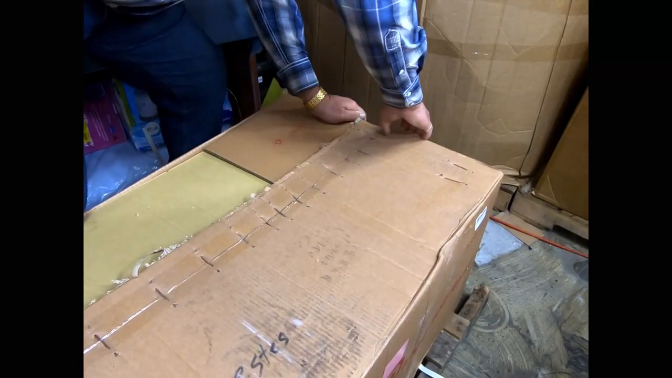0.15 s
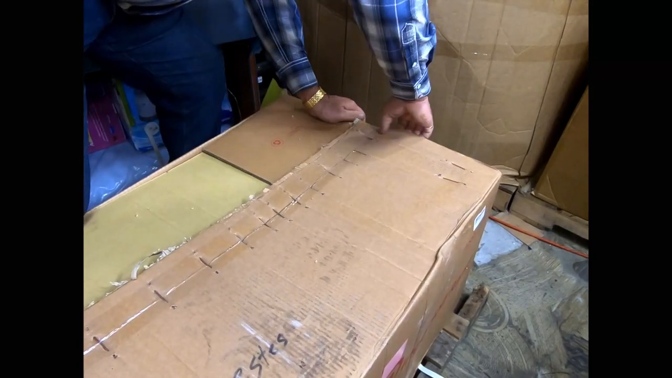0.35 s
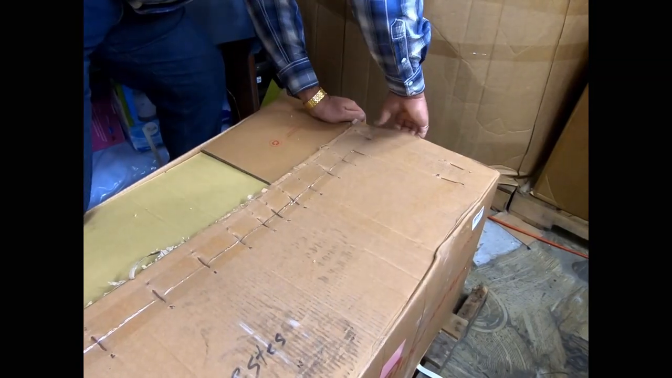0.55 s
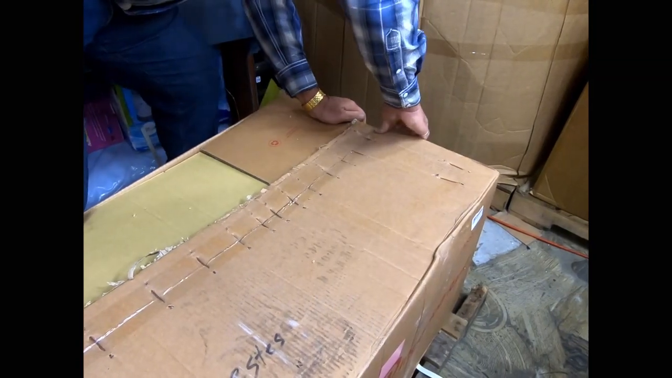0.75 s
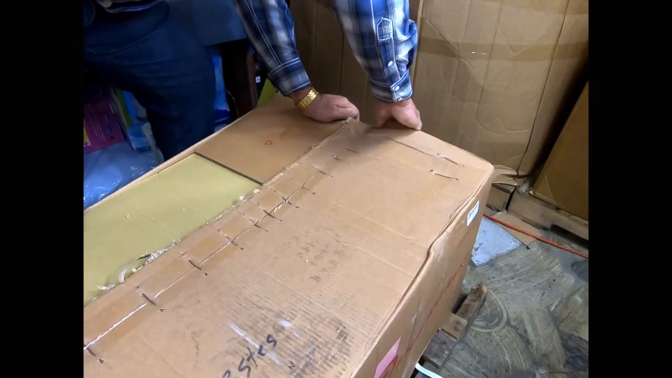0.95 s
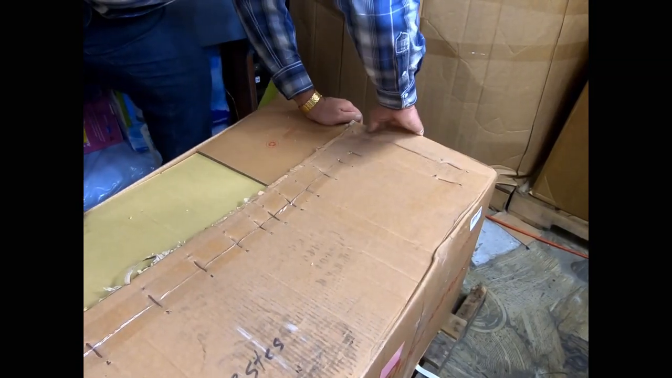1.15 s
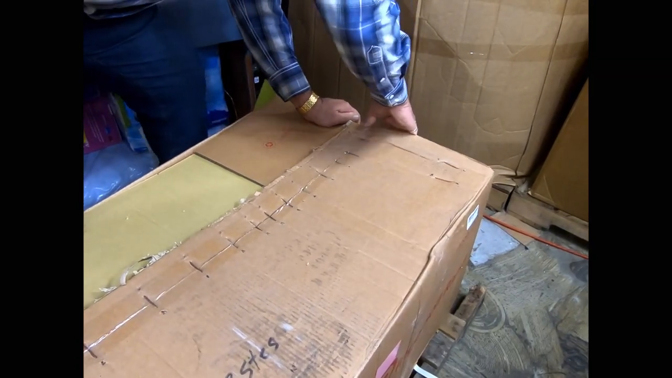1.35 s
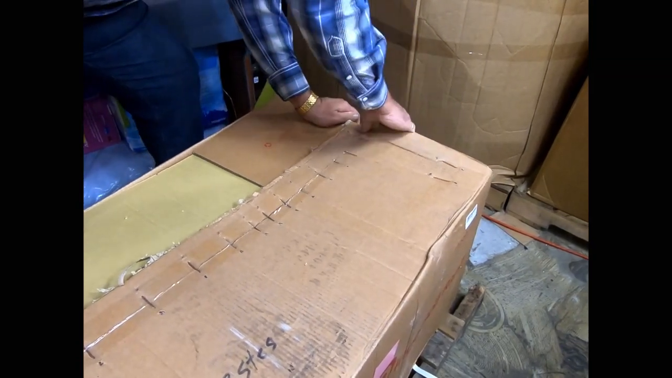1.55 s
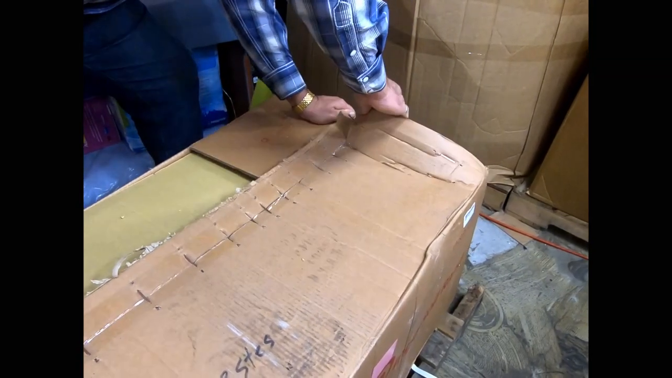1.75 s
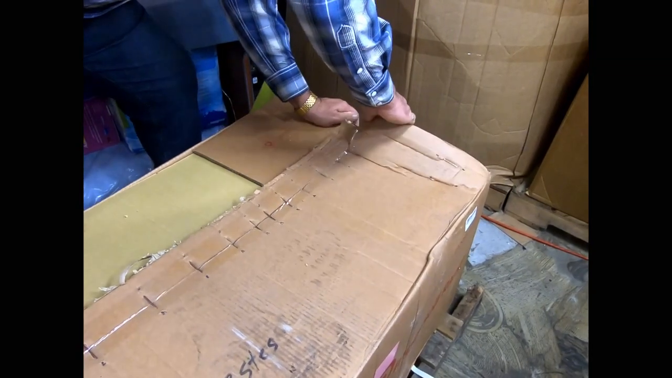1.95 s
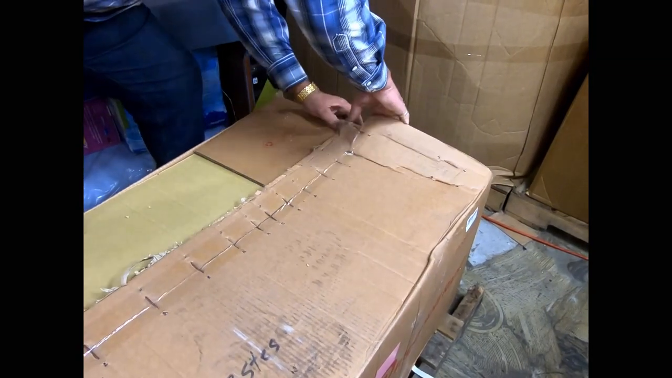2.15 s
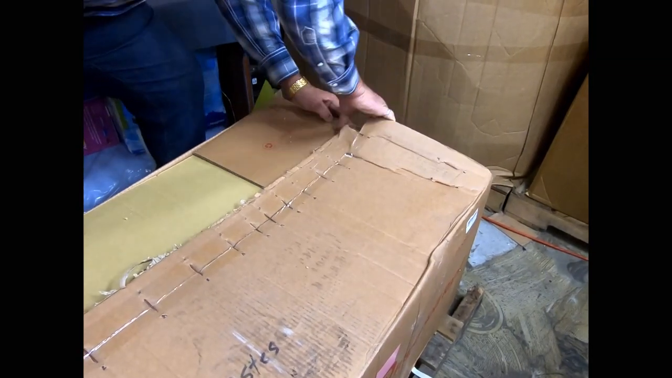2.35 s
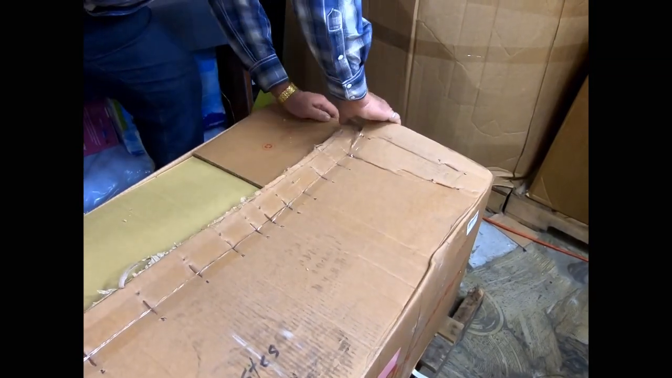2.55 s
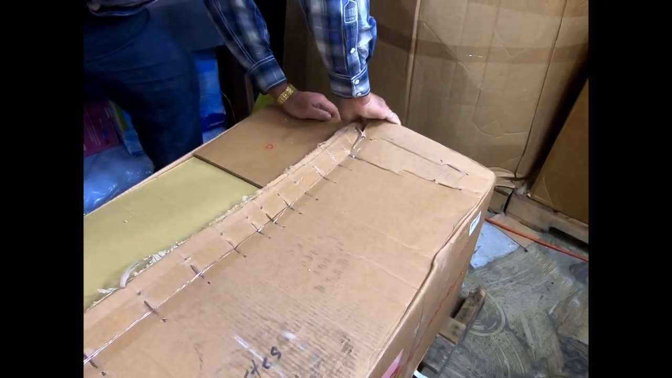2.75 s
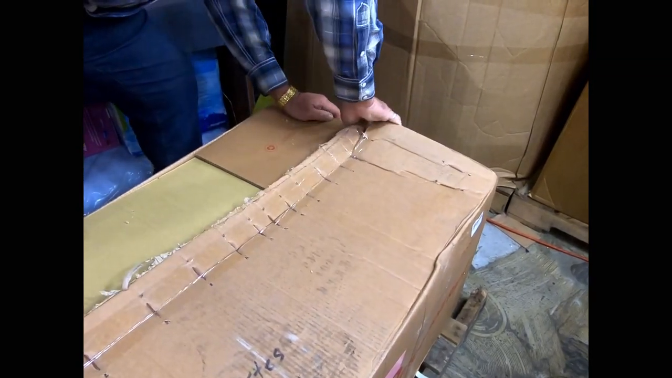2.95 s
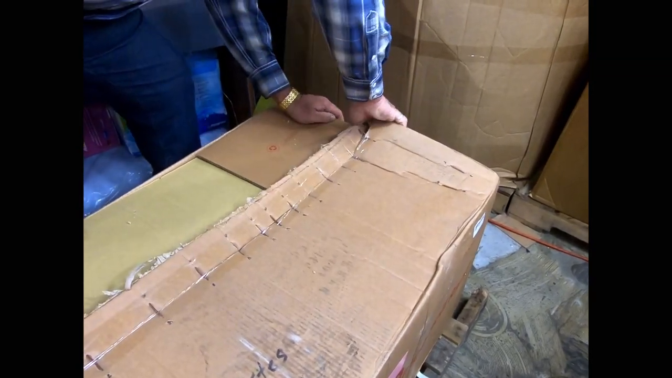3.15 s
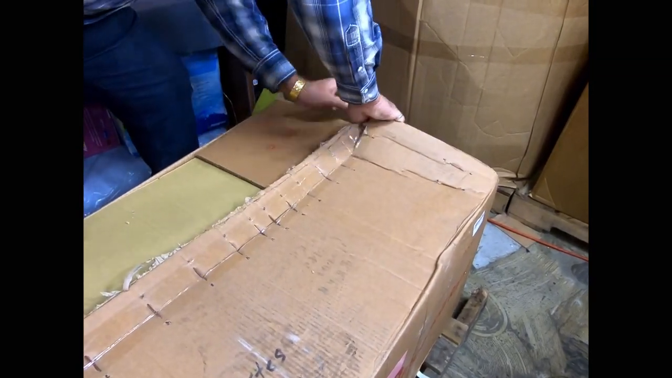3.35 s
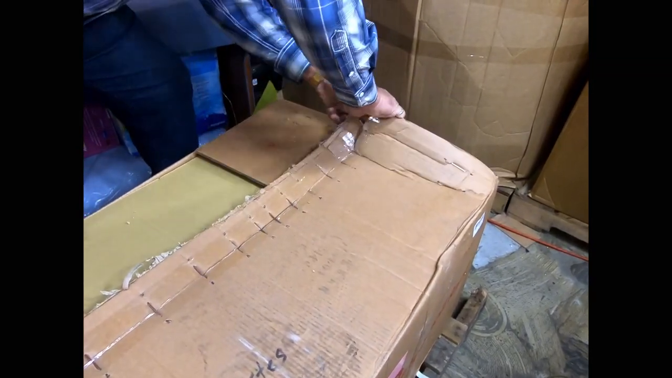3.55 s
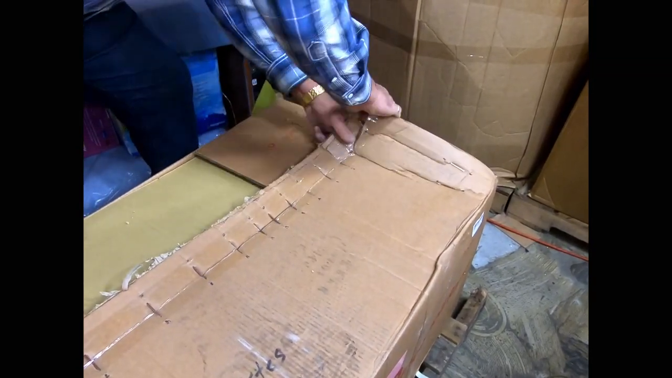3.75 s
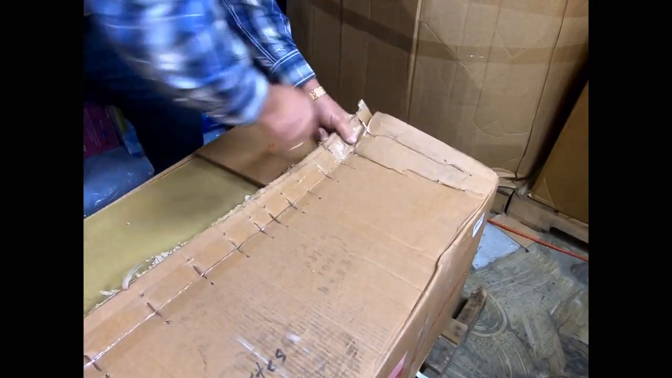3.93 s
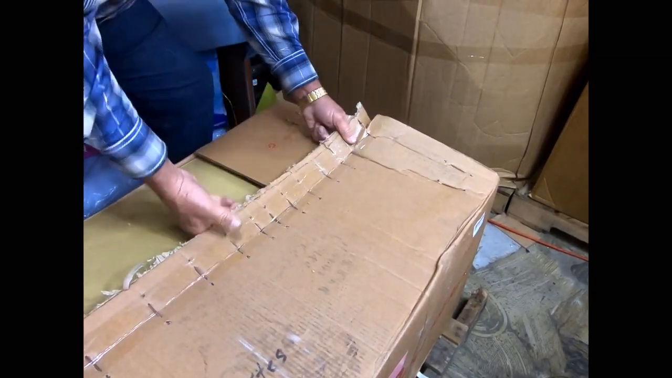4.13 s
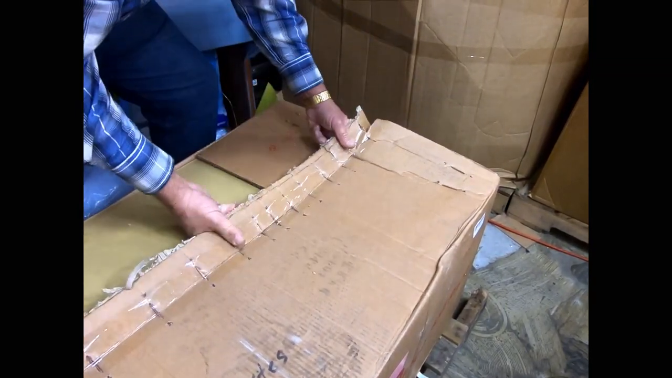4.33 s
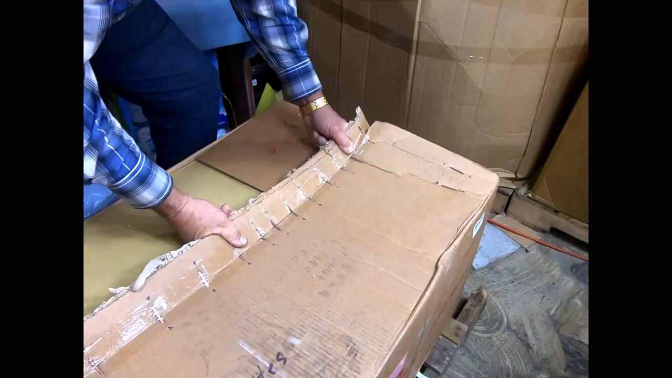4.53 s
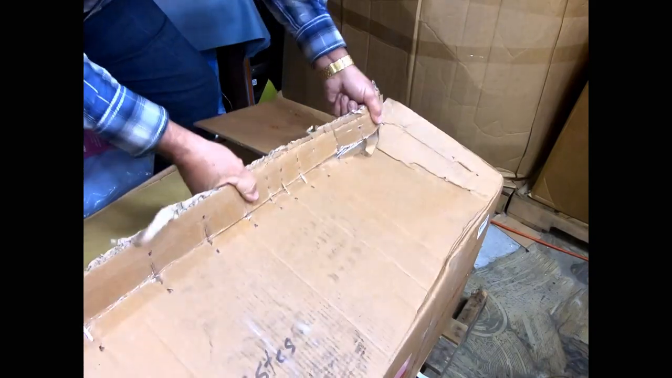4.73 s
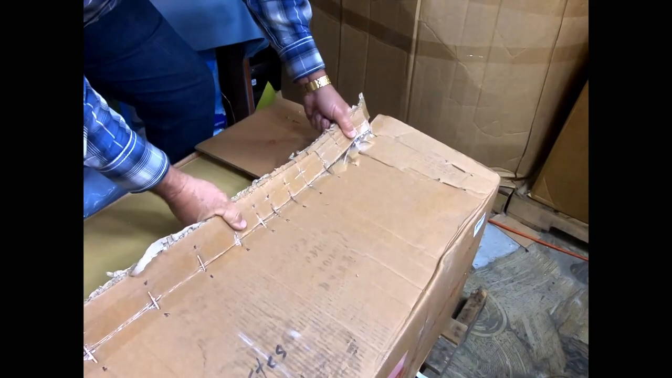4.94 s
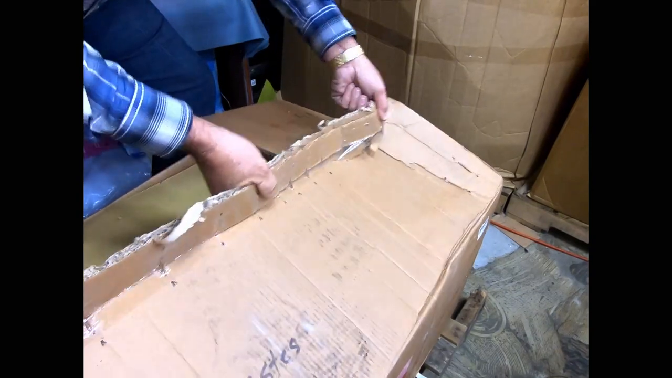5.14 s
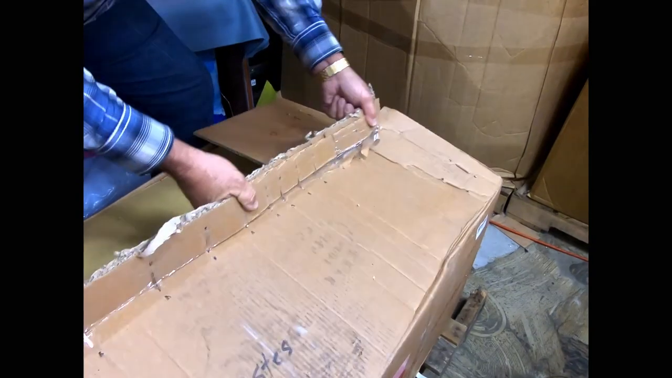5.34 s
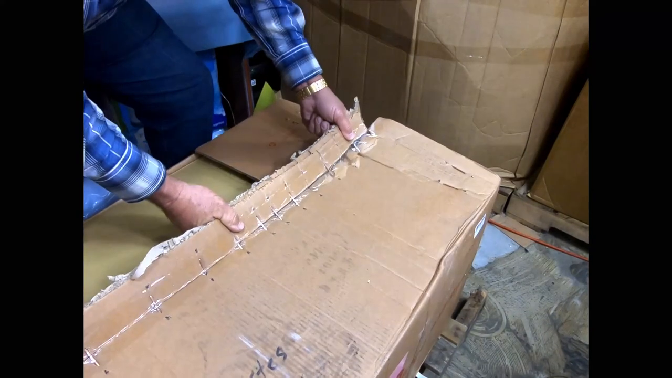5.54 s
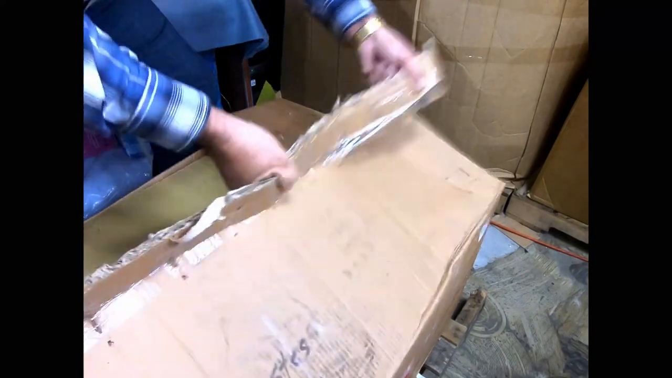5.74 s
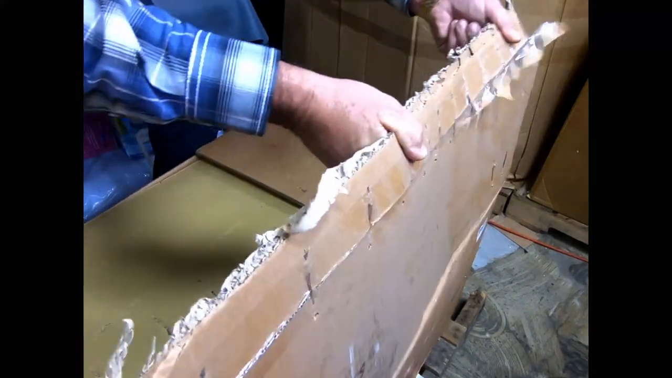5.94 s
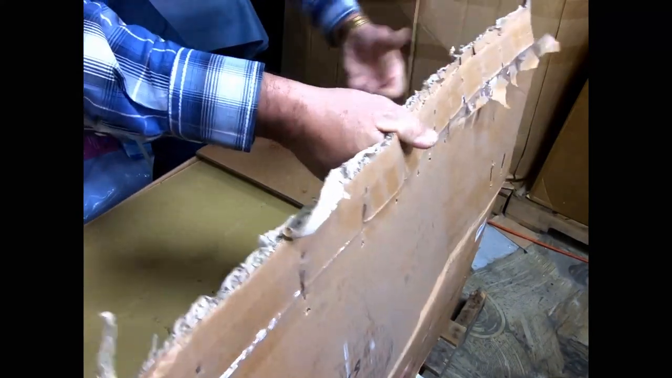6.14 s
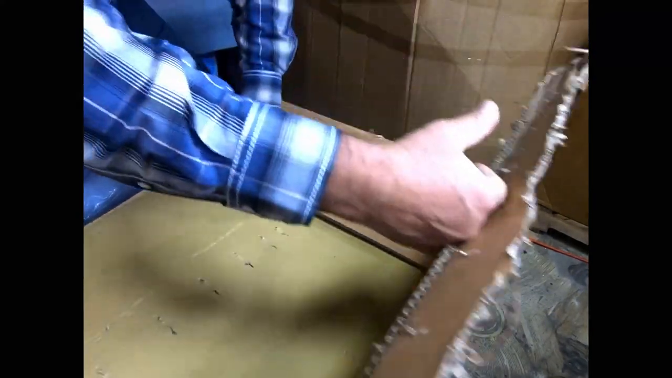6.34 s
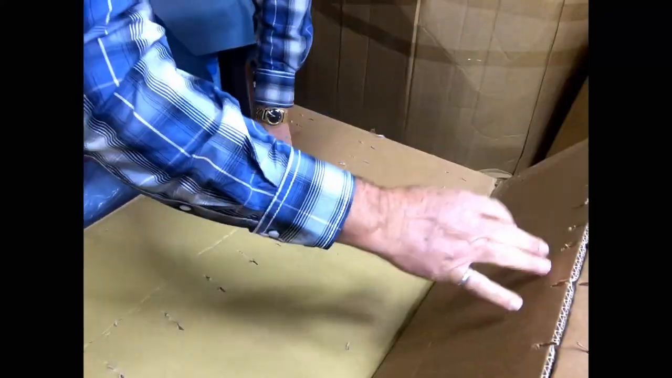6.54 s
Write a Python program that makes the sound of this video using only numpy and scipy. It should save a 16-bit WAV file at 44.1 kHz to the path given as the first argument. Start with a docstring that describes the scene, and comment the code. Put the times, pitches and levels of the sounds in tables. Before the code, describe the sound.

A big cardboard box is rubbed and squeaks, then rips open along a stapled seam with sharp cracks, crackles and hollow thumps.

```python
"""A big cardboard box is pulled open along a stapled seam in a rumbling, echoing warehouse.
Fingers rub and tap it, its inner ridges snap, the bending flap groans, and board squeaks on board.
Near 1.7 s the first staples burst out with a crack, a rip of fibres and a hollow thump. At 3.5 s another
scrapes out, ringing, and at 4 s the fold creaks. The seam then peels open, crackling and ripping, until
near 5.8 s the flap breaks free with heavy thumps, swings up and pushes two gusts of air."""
import sys
import numpy as np
from scipy import signal
from scipy.fft import rfft, irfft
from scipy.io import wavfile
from scipy.ndimage import uniform_filter1d

SR = 44100
rng = np.random.default_rng(int(sys.argv[2]) if len(sys.argv) > 2 else 0)


def transcribe(u):
    """Save the signal u as a 16-bit wav file named by the first command-line argument.

    u: samples, shape (n,) or (channels, n), limited to [-1, 1]; the rate is SR.
    q: integer samples, one column per channel.
    """
    v = np.clip(np.atleast_2d(u).T, -1, 1)
    q = np.round(v * 32767).astype(np.int16)
    wavfile.write(sys.argv[1], SR, q)


N = 290486
T = np.arange(N) / SR
CUTOFF_HZ = 16250

# Each _TONE table says which frequencies are strong or weak in a sound, not how loud the sound is.
# the warehouse's background rumble: (frequency [Hz], level [dB])
RUMBLE_TONE = [(12, -14), (30, -3), (55, -0.5), (130, 1.5), (250, -8.5), (450, -14.5), (800, -28),
               (1300, -23), (3000, -19.5), (7000, -33), (15000, -56)]
# sleeves and the box's paper skin rustling all along: (time [s], level [dB])
RUSTLE_LEVELS = [(0, -59.5), (0.6, -59), (1.3, -55), (1.7, -49), (2.05, -53), (2.25, -52), (2.6, -51),
                 (2.92, -64), (3.15, -49.5), (3.8, -65.5), (4.2, -48.5), (4.95, -52), (5.1, -72),
                 (5.4, -50.5), (5.68, -67), (5.9, -49.5), (6.4, -49.5), (6.58, -44.5)]
# that rustle: (frequency [Hz], level [dB])
RUSTLE_TONE = [(200, -12), (500, -3), (800, -13), (1200, 4.5), (1800, 1), (3200, -5), (7000, -7),
               (10000, -20.5), (15500, -34.5)]
# finger strokes: (strongest moment [s], half length [s], dull part [dB], hiss [dB])
FINGER_STROKES = [(0.222, 0.095, -59, -55), (0.576, 0.28, -50.5, -66), (0.978, 0.071, -48.5, -47),
                  (1.26, .17, -51.5, -61), (2.682, 0.03, -47.5, -46.5), (2.84, 0.035, -47.5, -59),
                  (3.1, 0.0334, -49.5, -47), (3.417, 0.088, -54.5, -53.5), (3.875, 0.051, -47.5, -48.5),
                  (3.934, 0.0353, -40, -43), (4.272, 0.076, -45, -48.5), (4.604, .08, -52.5, -52.5),
                  (5.011, 0.049, -51, -50), (5.155, 0.0114, -45, -36), (5.54, .065, -43.5, -42),
                  (6.322, 0.086, -56.5, -46)]
# the dull part of a stroke: (frequency [Hz], level [dB])
DULL_RUB_TONE = [(120, -20), (400, -0.5), (750, -8), (1200, 7.5), (1800, -5), (2600, -9.5), (5000, -49.5)]
# the hiss of a stroke: (frequency [Hz], level [dB])
HISS_TONE = [(1200, -37.5), (2800, 5), (4500, 4.5), (7000, 1.5), (9000, -8), (12000, -19), (15500, -46)]
# a wall of the box being drummed on: (frequency [Hz], level [dB])
WALL_TONE = [(60, -17.5), (170, -1), (300, -5), (500, 0), (750, -3), (1100, -5), (1800, -10.5), (4000, -34)]
# the loudest snaps of single ridges inside the board: (time [s], level [dB], pitch [Hz])
RIDGE_SNAPS = [(0.038, -32.5, 3800), (0.474, -32.5, 1980), (0.518, -30, 1590), (0.54, -30.5, 2070),
               (0.868, -31.5, 1540), (0.927, -25, 1940), (0.994, -27, 3630), (1.694, -25, 1570),
               (2.556, -33.5, 1980), (2.575, -27.5, 3020), (2.65, -23.5, 2770), (2.808, -27, 1430),
               (3.107, -26, 4150), (3.175, -30.5, 3850), (4.085, -26.5, 3500), (4.15, -26.5, 5000),
               (4.2695, -16, 2030), (4.288, -21.5, 2350), (4.339, -20.5, 2320), (4.452, -27, 3300),
               (4.5055, -18, 5100), (4.58, -19.5, 1770), (4.609, -21, 1770), (4.65, -20, 1990),
               (4.922, -26, 1900), (5.156, -25, 2720), (5.499, -25.5, 2940), (5.5295, -18.5, 3000),
               (5.585, -20.5, 1520), (6.365, -22.5, 4238)]
# the flap bending: (strongest moment [s], half length [s], level [dB], pitch [Hz])
FLAP_GROANS = [(0.398, 0.031, -44.5, 497), (3.886, .014, -42.5, 930), (3.926, 0.018, -42, 799),
               (4.767, .04, -31.5, 660), (5.02, 0.034, -47, 730), (5.219, 0.051, -37.5, 615),
               (5.279, 0.05, -40, 450), (5.525, 0.066, -48, 620), (5.763, 0.0305, -38.5, 590),
               (5.829, 0.038, -26, 560)]
# blows on the box, from light finger taps to heavy thumps as the seam and flap give way, and its walls spring
# back: (time [s], level [dB], rough pitch [Hz])
BOX_BLOWS = [(0.431, -36, 1150), (0.475, -29, 990), (0.519, -32.5, 980), (1.341, -32, 1110),
             (1.7245, -21.5, 674), (1.768, -21, 213), (1.811, -14, 132), (1.944, -21.5, 824),
             (2.811, -37.5, 182), (4.735, -19, 173), (4.834, -28, 463), (5.834, -7, 500),
             (5.857, -5.5, 264), (5.880, -16.5, 131), (5.954, -17.5, 201)]
# the notes the walls ring at: (frequency [Hz], level [dB], time to fade by 60 dB [s])
BOX_NOTES = [(116.4, -1, 0.11), (142.3, -1, 0.11), (163.8, 0.5, 0.12), (204.2, -0.5, 0.091),
             (241.6, -3, 0.1), (315, 0, 0.089), (380, -2.5, 0.04), (463, 1.5, 0.078), (544, -4, 0.051),
             (631, 2, 0.018), (810, 3.5, 0.0299), (957, 1, 0.041), (1117, -3, 0.049), (1480, 0, 0.024),
             (1650, 6, 0.027)]
# one list for each squeak: (time [s], slips [per s], level [dB], roughness [about 0-1])
SQUEAK_PATHS = [
    [(1.201, 780, -34, 0.5), (1.215, 710, -43.5, 0.64), (1.228, 740, -34.5, 0.42), (1.245, 780, -34, 0.2),
     (1.258, 817, -34.5, 0.29), (1.271, 730, -42.5, 0.46)],
    [(1.273, 1630, -45, 0.56), (1.286, 1460, -36, 0.06), (1.303, 1430, -34.5, 0.17),
     (1.314, 1350, -45.5, 0.2), (1.324, 1040, -44, 0.73)],
    [(1.487, 730, -47.5, 1.05), (1.503, 780, -44.5, 0.25), (1.514, 815, -34, 0.1), (1.524, 780, -37, 0.1),
     (1.532, 440, -64, 0.5)],
    [(1.574, 800, -37, 0.56), (1.586, 730, -34, 0.15), (1.594, 740, -38, 0.23), (1.600, 700, -39, 0.5)],
]
# squeaking board: (frequency [Hz], level [dB])
SQUEAK_TONE = [(300, -32), (780, -8.5), (1500, -3.5), (2350, 2.5), (3100, -3.5), (4200, -2.5), (5300, -18),
               (6000, -18.5), (7600, -16.5), (10000, -56), (15000, -63.5)]
# pulls that tear the board; rise and fall are the times for a 20 dB change:
# (time of full force [s], rise [s], hold [s], fall [s], level [dB], drumming relative to level [dB])
RIPS = [(1.721, 0.017, .004, 0.0089, -32.5, 9.5), (1.748, .001, 0.0135, 0.088, -17, -2),
        (3.49, .001, 0.0011, 0.013, -15, -24), (3.51, .012, 0.0077, 0.032, -32.5, -11),
        (4.738, 0.038, 0.048, 0.029, -22, -5), (5.233, 0.063, 0.0035, .028, -27, -2.5),
        (5.254, .003, 0.0029, 0.096, -38.5, 5), (5.74, 0.014, 0.0372, 0.051, -39.5, -10),
        (5.811, 0.017, 0.012, 0.0408, -18, -0.5), (5.887, 0.046, 0.0024, 0.11, -26, -0.5)]
# tearing fibres: (frequency [Hz], level [dB])
FIBRE_TONE = [(150, -25.5), (600, -1.5), (1200, 2.5), (2000, 1.5), (3200, -1), (4300, -3.5), (6300, -3.5),
              (8000, -9), (10000, -14.5), (15500, -36)]
# staples and glue let go and kick the box:
# (time [s], crack level [dB], crack pitch [Hz], kick level [dB], rough kick pitch [Hz])
SEAM_CRACKS = [(1.7477, 1.5, 3020, -17.5, 190), (1.7547, -10, 3500, -10.5, 496),
               (1.7776, -2, 1530, -6.5, 1556), (3.491, -2.5, 6000, -29.5, 274),
               (3.645, -18, 1414, -24.5, 1090), (4.7183, -15, 1471, -17.5, 750),
               (4.732, -5, 3470, -9.5, 824), (5.2336, -15.5, 2316, -20.5, 1190),
               (5.2555, -9.5, 1500, -12, 950), (5.842, -8, 1780, -9.5, 200), (5.850, -7.5, 1390, -6.5, 996),
               (5.894, -13, 3930, -21.5, 150)]
# a dragged staple, ringing near 1 kHz: (frequency [Hz], level [dB])
STAPLE_TONE = [(300, -28), (800, -11), (960, -0.5), (1060, 7), (1180, -2), (1500, -6.5), (2600, -1.5),
               (4200, -4), (5600, 1), (7600, -0.5), (9500, -13), (15000, -35)]
# the creaking fold: (frequency [Hz], level [dB])
CREAK_TONE = [(300, -20), (700, -13), (1100, 1.5), (1900, 4), (3000, 3.5), (4200, -7.5), (7000, -22),
              (10000, -30), (15000, -56)]
# swirling air: (frequency [Hz], level [dB])
AIR_TONE = [(10, -14), (25, -4), (40, 1.5), (60, 0.5), (90, -20), (200, -26.5), (1000, -55), (8000, -90)]
# gusts from the swinging flap: (time of full force [s], hold [s], level [dB])
GUSTS = [(5.847, 0.089, -28.5), (6.226, 0.13, -33.5)]
# the warehouse's echo: (frequency [Hz], level [dB])
ECHO_TONE = [(100, -11.5), (400, -10.5), (750, -1.5), (1100, -2.5), (1500, 1), (3000, 1.5), (6500, 0.5),
             (14000, 3)]
# how long the echo lasts: (frequency [Hz], time to fade by 60 dB [s])
ECHO_FADES = [(150, 0.61), (600, 0.51), (1500, 0.52), (5000, 0.77), (12000, 0.77)]


def from_db(db):
    """Turn decibels into a number to multiply by."""
    return 10 ** (np.asarray(db) / 20)


def unit_level(x):
    """Scale a sound so that its average (rms) level is 1."""
    return x / np.sqrt(np.mean(x ** 2) + 1e-20)


def peak_at(x, db):
    """Scale a sound so that its highest peak has this level."""
    return from_db(db) * x / np.abs(x).max()


def at_hz(table, hz):
    """Read between a table's rows, with octaves evenly spaced."""
    frequencies, values = np.transpose(table)
    return np.interp(np.log(np.maximum(hz, 1)), np.log(frequencies), values)


def add(out, s, sound):
    """Mix a sound in at time s."""
    start = max(round(s * SR), 0)
    out[start:start + len(sound)] += sound[:max(N - start, 0)]


def gate(t, start, end, fade_s):
    """1 between two times and 0 outside, with short fades."""
    return np.clip(np.minimum(t - start, end - t) / fade_s, 0, 1)


def swell(half_s):
    """A hump four half lengths long, 20 dB down one half length either side of its top."""
    position = np.linspace(-2, 2, max(round(4 * half_s * SR), 2))
    return from_db(-20 * np.abs(position) ** 1.8)


def envelope(s, hold_s, rise_s, fall_s):
    """Rise to 1 at time s, hold, then fall; the level moves 20 dB per rise_s or fall_s."""
    before = np.maximum(s - T, 0) / rise_s
    after = np.maximum(T - s - hold_s, 0) / fall_s
    return from_db(-20 * np.minimum(before + after, 10))


def colour(x, tone, size=4096):
    """Filter a sound so that it takes on the given tone."""
    gains = from_db(at_hz(tone, np.arange(size // 2 + 1) * SR / size))
    cepstrum = irfft(np.log(gains))
    ring = irfft(np.exp(rfft(2 * cepstrum[:size // 2], size)))   # rings after a click, never before
    return signal.oaconvolve(x, ring / np.linalg.norm(ring))[:len(x)]


def drift(per_s, size):
    """A random wander, mostly between -1 and 1."""
    points = rng.standard_normal(size // 10)
    return np.interp(np.arange(size) * per_s / SR, np.arange(len(points)), points)


def grains(per_s, spread_db, clump_db):
    """Random clicks of very uneven size that come in clumps."""
    db = spread_db * np.minimum(rng.exponential(1, N), 4) + clump_db * drift(300, N)
    return unit_level(from_db(db) * rng.choice([-1, 1], N) * (rng.random(N) < per_s / SR))


def rumble(level_db=-56.5):
    """The warehouse's background: a steady, low noise."""
    return from_db(level_db) * colour(rng.standard_normal(N), RUMBLE_TONE)


def hand_effort():
    """How hard the hands work over time: the strengths of dull rubbing, hiss and rustle."""
    dull, hiss = np.zeros(N), np.zeros(N)
    for s, half_s, dull_db, hiss_db in FINGER_STROKES:
        add(dull, s - 2 * half_s, swell(half_s) * from_db(dull_db))
        add(hiss, s - 2 * half_s, swell(half_s) * from_db(hiss_db))
    return dull, hiss, from_db(np.interp(T, *np.transpose(RUSTLE_LEVELS)))


def rubbing(rustle_db=-3.5, press_db=29.5):
    """Skin and sleeves catch on the rough paper in tiny clicks; heavy strokes drum the box wall."""
    dull, hiss, sleeves = hand_effort()
    catches = grains(per_s=5000, spread_db=4.3, clump_db=4.0)
    rustle = grains(per_s=12000, spread_db=3.0, clump_db=4.5) * sleeves * from_db(rustle_db)
    press = dull ** 2 * from_db(press_db)
    return (colour(catches * dull, DULL_RUB_TONE) + colour(catches * hiss, HISS_TONE)
            + colour(catches * press, WALL_TONE) + colour(rustle, RUSTLE_TONE))


def snaps(table, scatter, decay_s, width_octaves=0.86, top_hz=8500, size=2048):
    """Each break is one click that scatters among the board's ridges, strongest around its pitch."""
    out, bands = np.zeros(N), np.geomspace(60, 16000, num=30)
    for s, db, hz, *_ in table:
        click = scatter * rng.standard_normal(size) * np.exp(-T[:size] / decay_s)
        click[0] += 1
        hump_db = -10 * np.log10(1 + (np.log2(bands / hz) / width_octaves) ** 4)
        edges_db = -10 * np.log10((1 + (bands / top_hz) ** 10) * (1 + (hz / 3 / bands) ** 4))
        add(out, s, peak_at(colour(click, np.c_[bands, hump_db + edges_db]), db))
    return out


def crackle(usual_effort_db=-51.5, usual_per_s=9, peel_per_s=32, low_hz=1390, high_hz=6500, chances=900):
    """Single fibres snap at random, more often and louder as the hands work harder or the seam peels."""
    place, luck, pitch = rng.random((chances, 3)).T
    s = (np.arange(chances) + place) / chances * T[-1]
    effort = np.interp(s, T, np.linalg.norm(hand_effort(), axis=0)) / from_db(usual_effort_db)
    peeling = gate(s, start=4.42, end=5.62, fade_s=0.043)
    db = -33 + 2.5 * peeling + 6.8 * np.log10(effort) + 4 * rng.uniform(-1, 1, chances)
    hz = low_hz * (high_hz / low_hz) ** pitch
    per_s = usual_per_s * np.sqrt(effort) + peel_per_s * peeling * effort
    happens = luck < per_s * T[-1] / chances
    return snaps(np.c_[s, db, hz][happens], scatter=0.17, decay_s=0.0021)


def groans(width_octaves=0.084):
    """Friction in the bending flap makes it ring hollowly, at a different pitch for each bend."""
    out, bands = np.zeros(N), np.geomspace(100, 6000, num=80)
    for s, half_s, db, hz in FLAP_GROANS:
        octaves = np.abs(np.log2(bands / hz))
        tone = np.c_[bands, -10 * np.log10(1 + (octaves / width_octaves) ** 2) - 7 * octaves]
        bend = swell(half_s) * from_db(db)
        add(out, s - 2 * half_s, colour(rng.standard_normal(len(bend)) * bend, tone))
    return out


def box_rings(contact_s=0.00031, size=9000):
    """Each note of the box walls is a fading sine wave; one row for each."""
    t = T[:size]
    hz, db, fade_s = np.transpose(BOX_NOTES)[:, :, None]
    return np.sin(2 * np.pi * hz * t) * from_db(db - 60 * t / fade_s) * (1 - np.exp(-t / contact_s))


def thumps(reach_octaves=0.7, uneven_db=2.9):
    """A blow, or the kick of a crack, wakes the box's notes near its own pitch."""
    out, rings, hz = np.zeros(N), box_rings(), np.array(BOX_NOTES)[:, 0]
    kicks = [(s, db, pitch) for s, _, _, db, pitch in SEAM_CRACKS]
    for s, db, pitch in list(BOX_BLOWS) + kicks:
        distance = np.log2(hz / pitch) / reach_octaves
        strength = from_db(rng.normal(0, uneven_db, len(hz))) / (1 + distance ** 4)
        add(out, s, peak_at((strength * rng.choice([-1, 1], len(hz))) @ rings, db))
    return out


def squeaks(jitter=0.172, flutter_db=7.0):
    """Board pressed on board sticks and slips; uneven slips turn the note into a rasp."""
    out = np.zeros(N)
    for path in SQUEAK_PATHS:
        s, *columns = np.transpose(path)
        t = np.arange(s[0], s[-1], 1 / SR)
        hz, db, rough = (np.interp(t, s, column) for column in columns)
        cycles = np.cumsum(hz * (1 + jitter * rough * drift(897, len(t)))) / SR
        slips = unit_level(sum(np.cos(2 * np.pi * k * cycles) * (k * hz < CUTOFF_HZ)
                               for k in range(1, 20)))
        slips *= from_db(flutter_db * rough * drift(664, len(t)))
        rasp = rough * rng.standard_normal(len(t))
        squeak = unit_level(colour(slips + rasp, SQUEAK_TONE))
        add(out, s[0], squeak * from_db(db) * gate(t, s[0], s[-1], fade_s=0.0024))
    return out


def tearing(wall_lag_s=0.00494):
    """Fibres break by the thousand and drum on the wall, which feels the pull later and rings on."""
    pull, drum = np.zeros(N), np.zeros(N)
    for s, rise_s, hold_s, fall_s, db, wall_db in RIPS:
        pull += from_db(db) * envelope(s, hold_s, rise_s, fall_s)
        drum += from_db(db + wall_db) * envelope(s + wall_lag_s, hold_s, rise_s, 0.97 * fall_s)
    breaks = grains(per_s=6500, spread_db=3.0, clump_db=2.5)
    breaks /= np.sqrt(uniform_filter1d(breaks ** 2, size=600) + 1e-6)   # a steady pull tears steadily
    wall = colour(breaks * drum, WALL_TONE)
    ring = rng.choice([-1, 1], len(BOX_NOTES)) @ box_rings()
    ringing = signal.fftconvolve(breaks * drum, ring / np.linalg.norm(ring))[:N]
    return colour(breaks * pull, FIBRE_TONE) + 0.75 * wall + 0.1565 * ringing


def seam_cracks():
    """Staples and glue let go all at once, in short, noisy snaps."""
    return from_db(-0.5) * snaps(SEAM_CRACKS, scatter=0.53, decay_s=0.0012)


def staple_scrape(s=3.497, level_db=-27.0, fade_s=0.43):
    """One staple scrapes out of the board with a fading, ringing hiss."""
    drag = from_db(level_db - 60 * np.maximum(T - s, 0) / fade_s) * (T > s)
    return colour(grains(per_s=5700, spread_db=1.5, clump_db=2.5) * drag, STAPLE_TONE)


def creak(start_s=4.012, gap_s=0.01836, slowing_s=0.00072, bounce_s=0.00107, count=11, size=1500):
    """The bent fold slips in a run of clicks that slow down and grow louder."""
    out, s = np.zeros(N), start_s
    for k in range(count):
        slip = 0.066 * rng.standard_normal(size) * np.exp(-T[:size] / 0.005)
        slip[[0, round(bounce_s * SR)]] += [1, 0.42]   # the click and its bounce off the flap's edge
        db = -30.5 + 10.5 * (k / (count - 1)) ** 0.44 + 1.5 * rng.standard_normal()
        add(out, s, peak_at(colour(slip, CREAK_TONE), db))
        s += gap_s + slowing_s * k
    return out


def gusts():
    """Air swirling behind the swinging flap buffets the microphone."""
    swirls = colour(rng.standard_normal(N), AIR_TONE)
    swirls /= np.sqrt(uniform_filter1d(swirls ** 2, size=2500))
    push = sum(from_db(db) * envelope(s, hold_s, rise_s=0.026, fall_s=0.055) for s, hold_s, db in GUSTS)
    return swirls * push


def warehouse_echo(x, level_db=-11.0, build_s=0.0036, size=40000):
    """Echoes from the stacked boxes blur together; each octave fades at its own speed."""
    t, hz = T[:size], np.arange(size // 2 + 1) * SR / size
    spectrum = rfft(rng.standard_normal(size)) * from_db(at_hz(ECHO_TONE, hz))
    tail = np.zeros(size)
    for low_hz in 44 * 2 ** np.arange(9):
        octave = irfft(spectrum * ((hz >= low_hz) & (hz < 2 * low_hz)))
        tail += octave * from_db(-60 * t / at_hz(ECHO_FADES, low_hz * np.sqrt(2)))
    tail *= np.minimum(t / build_s, 1)
    return from_db(level_db) * signal.fftconvolve(x, tail / np.linalg.norm(tail))[:N]


def scene(lowest_hz=95):
    """Mix the box, its echo, the gusts and the background into one channel."""
    background = rumble()
    box = seam_cracks() + tearing() + thumps() + rubbing() + staple_scrape() + groans() + squeaks()
    bass_cut = signal.butter(2, lowest_hz, "high", fs=SR, output="sos")
    box = signal.sosfilt(bass_cut, box)   # the walls give off no deep bass
    ridges = from_db(-0.5) * snaps(RIDGE_SNAPS, scatter=0.16, decay_s=0.00282)
    direct = box + ridges + creak() + crackle()
    return (direct + warehouse_echo(direct) + gusts() + background)[None]


def record(dry, ceiling=0.85):
    """Round off the loudest peaks and cut the very highest treble."""
    rounded = dry / (1 + (dry / ceiling) ** 8) ** (1 / 8)
    return signal.sosfilt(signal.cheby2(16, 70, CUTOFF_HZ, fs=SR, output="sos"), rounded)


dry = scene()
out = record(dry)
transcribe(out)
```